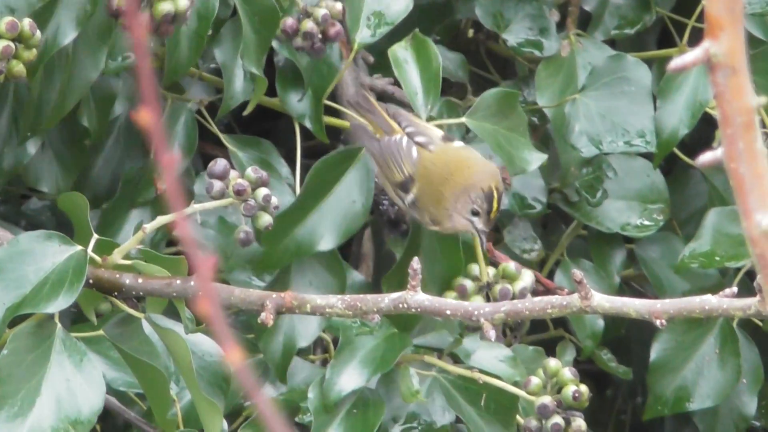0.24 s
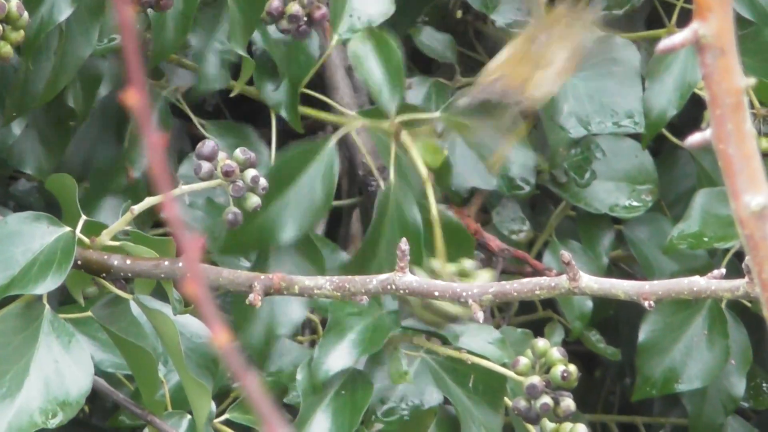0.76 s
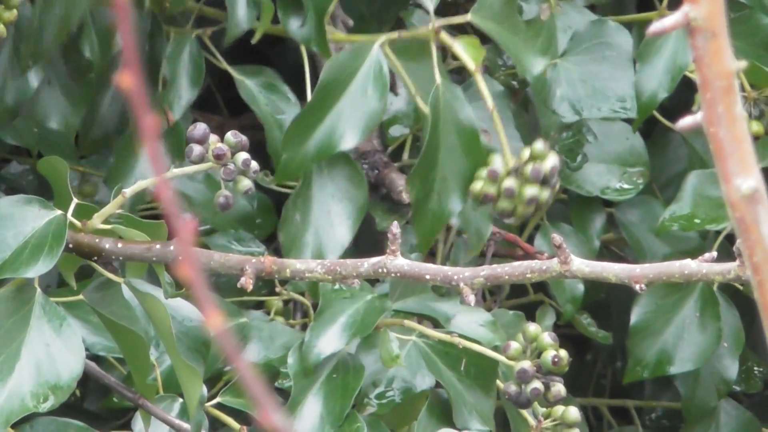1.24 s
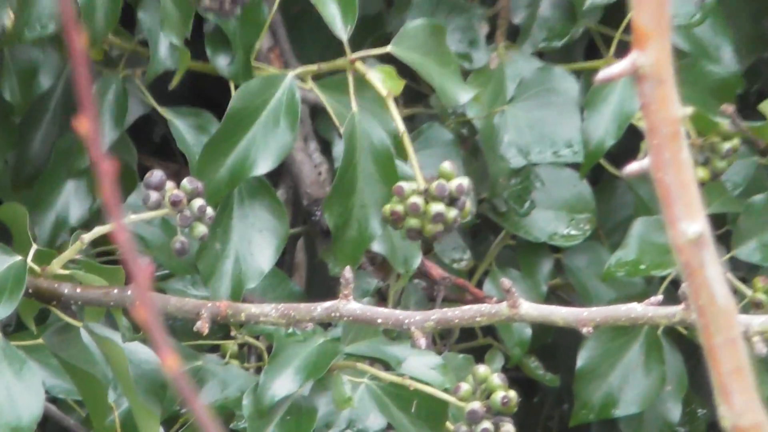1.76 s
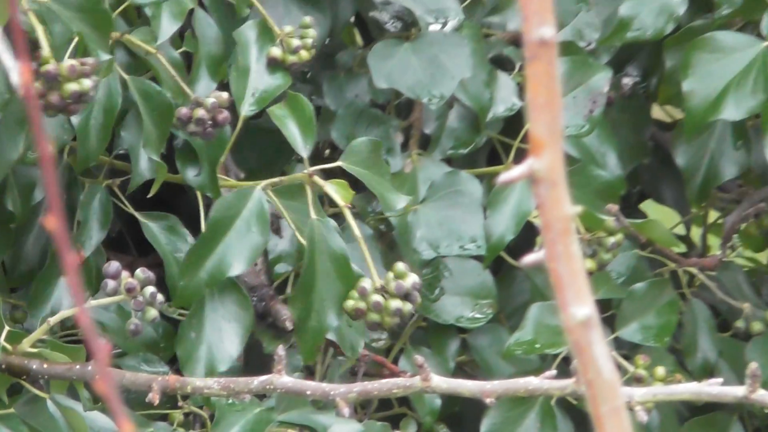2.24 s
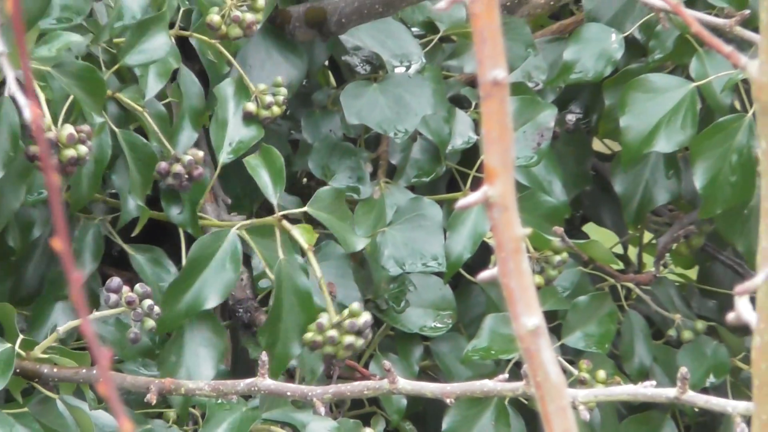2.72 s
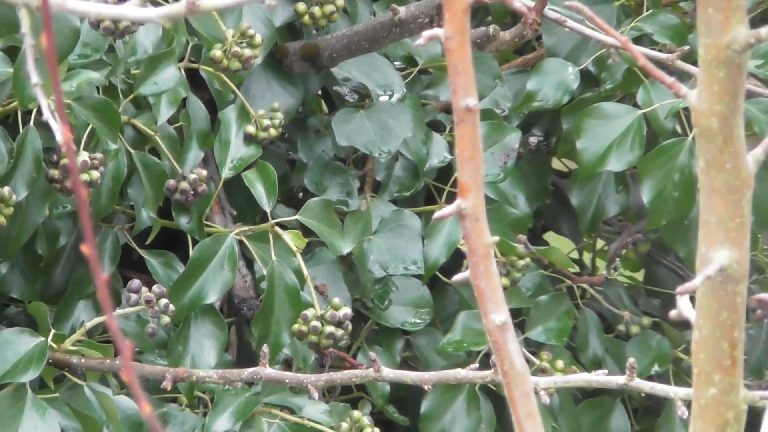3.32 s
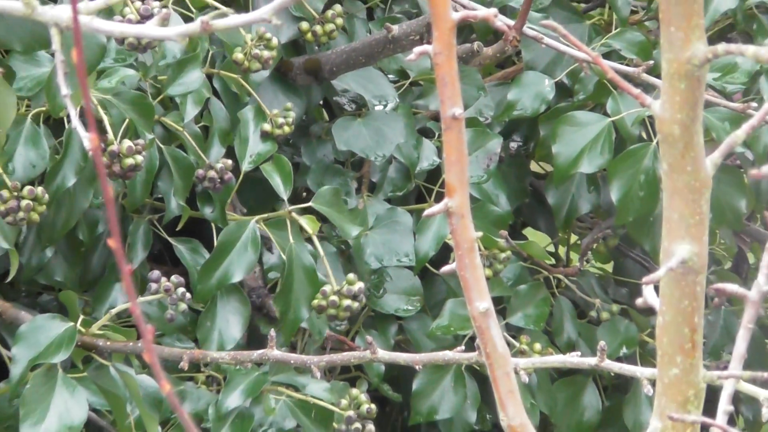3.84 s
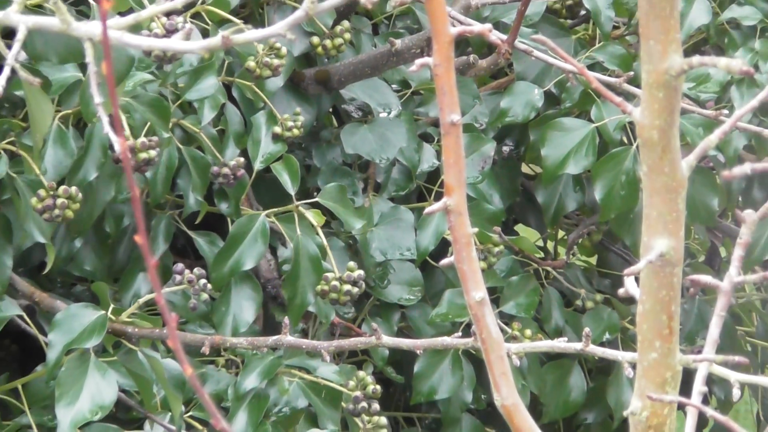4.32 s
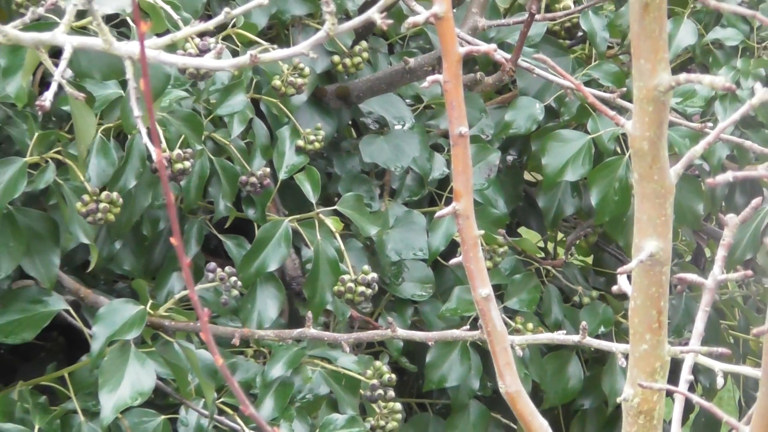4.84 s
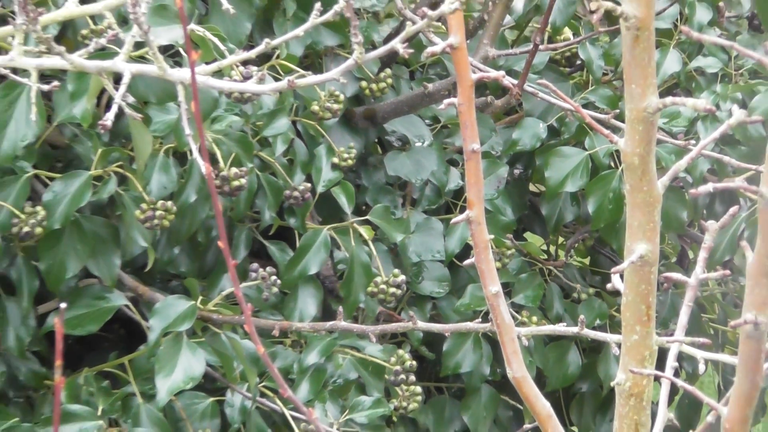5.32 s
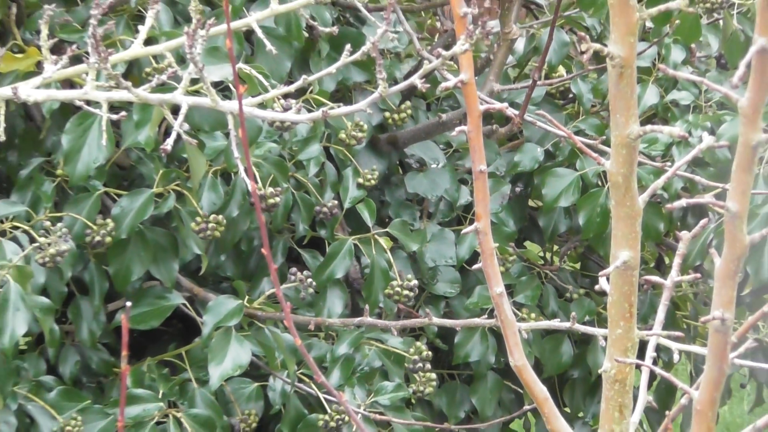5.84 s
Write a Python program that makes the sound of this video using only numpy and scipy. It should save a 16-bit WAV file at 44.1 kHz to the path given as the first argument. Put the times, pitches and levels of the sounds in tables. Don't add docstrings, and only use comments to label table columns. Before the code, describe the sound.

Steady low road rumble with faint hiss; a needle-thin bird whistle, a quick crackle of twigs and wings, then scattered high peeps and buzzy chips.

```python
import sys
import numpy as np
from scipy import signal
from scipy.fft import rfft, irfft, next_fast_len
from scipy.io import wavfile
from scipy.ndimage import uniform_filter1d, map_coordinates

SR = 44100
rng = np.random.default_rng(int(sys.argv[2]) if len(sys.argv) > 2 else 0)


def dump_mix(stems):
    frames = np.atleast_2d(stems).T
    limited = np.clip(frames, -1, 1)
    pcm = np.round(limited * 32767).astype(np.int16)
    wavfile.write(sys.argv[1], SR, pcm)


def gain_from_decibels(decibels):
    exponent = np.asarray(decibels, float) / 20
    return 10 ** exponent


N = 267775

# time in seconds, level in dB.
NEAR_BREATH = [(.575, -64), (.582, -64.5), (.626, -57), (.636, -49.5), (.66, -44), (.746, -42.5),
               (.812, -46.5), (.836, -54), (.848, -65)]
# time in seconds, pitch in Hz, level in dB.
SHORT_WHISTLE = [(3.852, 8130, -66), (3.865, 8050, -60), (3.89, 8070, -54), (3.912, 7940, -48.5),
                 (3.925, 8000, -60), (3.945, 7800, -59), (3.958, 7760, -58), (3.973, 7300, -81)]
# start in seconds, length in seconds, resting pitch in Hz, level in dB, swell in dB.
FAR_WHISTLES = [
    (3.362, 0.21, 8020, -65, 2),
    (5.826, 0.21, 8320, -68, 8),
]
# time in seconds, half length in seconds, depth in dB.
VOICE_BREAKS = [
    (.5915, 0.0018, 29),
    (0.625, .001, 10),
    (5.96, 0.021, 13),
]
# start in seconds, length in seconds, rise in seconds, top pitch in Hz,
# level in dB over CHIP_DB.
CHIP_CALLS = [
    (4.488, .054, 0.0122, 7765, 1.5),
    (5.817, 0.045, 0.008, 7820, -2),
]
# delay in seconds, level in dB.
WALL_ECHOES = [(.007, -11), (.04, -16), (.046, -17), (.078, -19)]
# start in seconds, length in seconds, pitch in Hz, level in dB.
LEVEL_NOTES = [
    (3.403, 0.08, 6670, -69),
    (5.346, .086, 6610, -71.5),
]
# start in seconds, length in seconds, start pitch in Hz, end pitch in Hz, level in dB.
FAINT_NOTES = [(1.35, 0.11, 8850, 8300, -79), (1.527, .07, 8400, 8150, -77), (1.55, .05, 7500, 7100, -78),
               (1.605, .022, 6800, 7500, -73), (1.651, .016, 7900, 7000, -73),
               (3.103, 0.015, 6500, 7330, -70), (3.661, .015, 7600, 7600, -72),
               (3.672, 0.028, 6500, 7100, -73), (3.758, .022, 6200, 7700, -69.5),
               (3.855, .015, 6150, 7000, -73), (5.572, .1, 8150, 8050, -76),
               (3.96, 0.097, 2780, 2780, -82.5), (4.08, .07, 2870, 2800, -86)]
# time in seconds, peak in dB, knock in dB, twig ring in dB (both over peak).
SNAPS = [(.7158, -43.5, -4, -12), (.718, -40.5, -6.5, -3), (0.727, -55, -19, -12),
         (0.7315, -44, -2.5, -7.5), (0.737, -55, -18, -20), (0.84, -51.5, -8, -7), (0.852, -58, -4, -14),
         (0.869, -51, -9, -16), (0.883, -54, -18, -12), (.896, -60, -14, -14), (1.658, -63, -15, -3),
         (1.8462, -60, -11, -12), (4.422, -62, -12, -11), (4.84, -62, -12, -2), (5.1712, -59, -17, -7)]
# centre in Hz, width in Hz, level in dB.
SNAP_LEAVES = [(5860, 1060, 0), (7700, 770, 3.5), (9370, 930, 3.5), (11700, 3900, -12)]
# centre in Hz, width in Hz, level in dB.
TWIG_MODES = [(3360, 200, -3), (4120, 200, 1.5)]
# pitch in Hz, level in dB, 60 dB decay in seconds.
BRANCH_MODES = [(640, 1, 0.038), (1195, -14, 0.045)]
# peak in seconds, rise in seconds, level in dB, broad leaves in dB over it.
WING_BRUSHES = [
    (.716, .001, -53, -8),
    (.88, 0.047, -63, 0),
    (.965, .03, -72, -6),
]
# on in seconds, off in seconds, level in dB.
MOTOR_RUNS = [(.43, 0.61, -69.5), (1.886, 2.177, -71), (2.21, 2.32, -83), (3.303, 3.4, -71),
              (5.56, 5.68, -72)]
# time in seconds, peak in dB.
LENS_TICKS = [(.0273, -66), (.1875, -73), (.2468, -71), (1.127, -74), (1.6563, -70), (1.9068, -72),
              (1.9866, -71), (2.0539, -70), (2.1472, -69), (2.4266, -76), (3.3864, -70), (3.587, -73),
              (3.6269, -71), (3.7471, -70), (4.0185, -70), (4.0664, -71), (5.4866, -72)]
# centre in Hz, width in Hz, level in dB.
BARREL_MODES = [(6500, 120, -4), (6860, 120, -5), (7340, 170, -1.5), (7920, 170, -2.5), (8320, 260, -2),
                (9530, 480, -2.5)]
# time in seconds, level in dB.
TRAFFIC_FLOW = [(0, 2), (.5, -1.5), (1.37, 1.5), (1.66, -2), (2.0, 0.5), (2.74, -2), (3.11, 2), (4.0, .5),
                (4.63, -2), (5.11, -1), (5.5, -5), (6.07, -4.5)]
# frequency in Hz, density in dB per Hz.
RUMBLE_SPECTRUM = [(12, -45), (25, -10), (49, -3.5), (100, 0), (155, 1), (290, 1), (345, -3), (375, -13),
                   (420, -14), (550, -20), (920, -120)]
TYRE_SPECTRUM = [(220, -24.5), (380, -1), (549, -1), (950, -5), (1200, -15), (1300, -22.5), (1410, -38),
                 (1830, -64), (3100, -120)]
AIR_SPECTRUM = [(830, -37), (1410, -10), (1500, 2.5), (1570, 0), (1820, -1.5), (2500, -19), (3250, -40),
                (5500, -120)]
# centre in Hz, width in Hz, level in dB.
FAR_ENGINE = (324, 8.6, -59)
# time in seconds, level in dB.
BREEZE_LEVEL = [(0.0, -74.5), (0.56, -78), (0.79, -77), (1.15, -76.5), (2.45, -80.5), (3.84, -76),
                (3.99, -72.5), (4.6, -83.5), (6.07, -80)]
# frequency in Hz, density in dB per Hz.
LEAF_SPECTRUM = [(1400, -46), (2500, -15), (3000, -3.5), (4200, -3), (5100, -10), (6200, 0), (8000, 4),
                 (11000, -41)]
HISS_SPECTRUM = [(1410, -26), (2400, -32), (2580, -12), (2950, -7), (3400, -8.5), (4170, -10), (4800, -8.5),
                 (5130, -9), (5500, -6), (6400, -5.5), (7300, -0.5), (8410, 1.5), (10100, 1), (15800, 0)]
# frequency in Hz, correlation.
LIKENESS = [(30, -.3), (42, .3), (58, .8), (80, .93), (110, .95), (200, .96), (380, .93), (700, .95),
            (1290, .98), (2200, .76), (3000, .97), (6800, .97), (7800, .7), (9500, .45), (12000, .33),
            (15000, .3)]
# frequency in Hz, left minus right in dB.
BALANCE = [(30, -4.5), (60, -.7), (110, 0), (200, -0.5), (380, 3), (700, 2), (1290, -1.5), (15000, 0)]
# centre in Hz, width in Hz, depth from 0 to 1.
HOUSING_NOTCHES = [(1440, 85, 0.9), (5120, 650, 0.51)]

SAG_HZ_PER_S, SETTLE_HZ = 6550, 150
NEAR_TOP_HZ, NEAR_REST_HZ = 8775, 7385
FAR_TOP_HZ, SWELL_S, RELEASE_S, RELEASE_DB = 8860, 0.09, 0.03, 10
CHIP_DB, CHIP_RISE_HZ_PER_S, CHIP_SAG_HZ_PER_S = -50.5, 31000, 10000
CHIP_BREAK_S, CHIP_BEAT_S, CHIP_GAP_S, CHIP_GAP_DB = 0.005, 0.0245, 0.0025, 18
EDGE_S, EDGE_CURL_HZ, EDGE_DB = 0.012, 90, 6
FAINT_BEND, FAINT_WAVER = 0.64, 0.007
SPLINTER_S, FLUTTER_T60_S = 0.003, 0.22
STEP_S, STEP_PHASE_S, STEP_SHARE, STEP_DB = 0.02, 0.0068, 0.11, -76
RUMBLE_DB, TYRES_DB, AIR_DB, HISS_DB = -46, -52.5, -79.5, -67.5
RUMBLE_GROWS, TYRES_GROWS = 0.41, 0.17
TOP_HZ = 15740


def near_bird():
    track = np.zeros(N)
    s, db = np.transpose(NEAR_BREATH)
    t = times(s[0], s[-1] - s[0])
    level = np.interp(t, s, db) - breaks(t, VOICE_BREAKS)
    rows = np.c_[t, fall(t, NEAR_TOP_HZ, NEAR_REST_HZ), level]
    add(track, s[0], whistle(rows, waver_hz=12, flicker_db=1.5, rate=270, edge=0.0012))
    return ports(garden(track, t60=0.28, wet_db=-11), pan_db=-5, lead=0.2)


def short_whistle():
    track = np.zeros(N)
    add(track, SHORT_WHISTLE[0][0], whistle(SHORT_WHISTLE, waver_hz=18, flicker_db=0.5, rate=180))
    return ports(garden(track, t60=0.32, wet_db=-9), pan_db=-6, lead=0.25)


def far_bird():
    track = np.zeros(N)
    for s, length, rest_hz, db, swell_db in FAR_WHISTLES:
        t = times(s, length)
        knots = [0, SWELL_S, length - RELEASE_S, length]
        level = np.interp(t - s, knots, [db - swell_db, db, db, db - RELEASE_DB])
        rows = np.c_[t, fall(t, FAR_TOP_HZ, rest_hz), level - breaks(t, VOICE_BREAKS)]
        add(track, s, whistle(rows, waver_hz=18, flicker_db=2.5, rate=170))
    return ports(garden(track, t60=0.3, wet_db=-3), pan_db=2.5, lead=1)


def chips():
    track = np.zeros(N)
    for s, length, rise, top_hz, db in CHIP_CALLS:
        t, top = times(s, length), s + rise
        pitch = top_hz - np.maximum(CHIP_RISE_HZ_PER_S * (top - t), CHIP_SAG_HZ_PER_S * (t - top))
        gaps = [(top + CHIP_BREAK_S + k * CHIP_BEAT_S, CHIP_GAP_S, CHIP_GAP_DB / (2 * k + 1))
                for k in range(2)]
        rows = np.c_[t, pitch, db - breaks(t, gaps)]
        chip = whistle(rows, waver_hz=35, flicker_db=2.2, rate=300, edge=0.0016)
        for delay, wall_db in [(0.00078, 0)] + WALL_ECHOES:
            add(track, s + delay, gain_from_decibels(CHIP_DB + wall_db) * chip)
    return ports(garden(track, t60=0.19, wet_db=-14), pan_db=-1, lead=-0.81)


def other_birds():
    track = np.zeros(N)
    ends = np.array([1, 0, 0, 1])
    for s, length, hz, db in LEVEL_NOTES:
        knots = s + np.array([0, EDGE_S, length - EDGE_S, length])
        call = np.c_[knots, hz + EDGE_CURL_HZ * ends, db - EDGE_DB * ends]
        add(track, s, whistle(call, waver_hz=25, flicker_db=1.8, rate=143))
        fifth = whistle(call, waver_hz=40, flicker_db=2.5, rate=150, ratio=3 / 2)
        add(track, s, gain_from_decibels(-12.5) * fifth)
    for s, length, start_hz, end_hz, db in FAINT_NOTES:
        middle_hz = start_hz + FAINT_BEND * (end_hz - start_hz)
        rows = [(s, start_hz, db), (s + length / 2, middle_hz, db), (s + length, end_hz, db)]
        add(track, s, whistle(rows, waver_hz=FAINT_WAVER * start_hz, flicker_db=2.5, rate=190, edge=0.0032))
    return ports(garden(track, t60=0.23, wet_db=-9), pan_db=-4, lead=0.6)


def snaps():
    cracks, rings, knocks = np.zeros((3, N))
    t = np.arange(SR // 20) / SR
    knock = sum(gain_from_decibels(db - 60 * t / t60) * np.sin(2 * np.pi * hz * t) for hz, db, t60 in BRANCH_MODES)
    knock = knock * (1 - np.exp(-t / 0.0019))
    for s, db, knock_db, ring_db in SNAPS:
        splinters = rng.standard_normal(len(t)) + 3.1 * (t == 0)
        add(cracks, s, gain_from_decibels(db + 8 - 26 * t / SPLINTER_S) * splinters)
        rings[round(s * SR)] = gain_from_decibels(db + ring_db + 30.5)
        add(knocks, s, gain_from_decibels(db + knock_db + 15) * knock)
    twig = filtered(rings, lambda hz: resonances(TWIG_MODES)(hz) * resonances([(4000, 3000, 0)])(hz))
    return filtered(cracks, resonances(SNAP_LEAVES)) + twig, knocks


def wings():
    now = np.arange(N) / SR
    beats = 0
    for s, rise, db, broad_db in WING_BRUSHES:
        loss_db = np.maximum(12 * (s - now) / rise, 60 * (now - s) / FLUTTER_T60_S)
        beats = beats + gain_from_decibels([[db], [db + broad_db]] - loss_db)
    rustle = beats * gain_from_decibels(3 + 2.5 * wobble(250)) * rng.standard_normal(N)
    small_and_broad = [(7800, 4700, 3), (2270, 1100, 0.5)]  # (Hz, width Hz, dB)
    leaves = lambda hz: np.array([resonances([mode])(hz) ** 2 for mode in small_and_broad])
    return filtered(rustle, leaves).sum(axis=0)


def takeoff():
    cracks, knocks = snaps()
    hedge = garden(cracks + wings(), t60=0.043, wet_db=-9.5)
    return ports(hedge, pan_db=2, lead=0.95) + knocks * gain_from_decibels([[1.9], [-1.9]])


def lens():
    t, gate, steps = np.arange(N) / SR, np.zeros(N), np.zeros(N)
    for on, off, db in MOTOR_RUNS:
        gate += gain_from_decibels(db) * np.clip(np.minimum(t - on, off - t) / 0.0058, 0, 1)
    turns = np.arange(STEP_PHASE_S, N / SR, STEP_S)
    luck = rng.random((len(turns), 2))
    small = [(s, STEP_DB + 3 * size) for s, (chance, size) in zip(turns, luck) if chance < STEP_SHARE]
    for s, db in small + LENS_TICKS:
        steps[round(s * SR)] = gain_from_decibels(db + 23)
    motor = filtered(rng.standard_normal(N), lambda hz: resonances(BARREL_MODES)(hz) ** 2)
    ticks = filtered(steps, resonances([(4300, 600, 9.5), (3200, 310, -8), (7500, 2500, -11)]))
    return ports(gate * unit(motor) + ticks, pan_db=-3, lead=-0.89)


def road():
    s, db = np.transpose(TRAFFIC_FLOW)
    flow_db = np.interp(np.arange(N) / SR, s, db)
    swell_db = 0.16 * wobble(3.245)
    hz, width, drone_db = FAR_ENGINE
    engine = unit(filtered(rng.standard_normal(N), resonances([(hz, width, 0)])))
    drone = gain_from_decibels(drone_db + 1.5 * wobble(1.2)) * engine
    rumble = gain_from_decibels(RUMBLE_DB + RUMBLE_GROWS * flow_db + swell_db) * rush(RUMBLE_SPECTRUM, patchy_db=-0.36)
    tyres = gain_from_decibels(TYRES_DB + TYRES_GROWS * flow_db + swell_db) * rush(TYRE_SPECTRUM, patchy_db=0.45)
    air = gain_from_decibels(AIR_DB + flow_db) * rush(AIR_SPECTRUM, patchy_db=0.8)
    return drone + rumble + tyres + air


def breeze():
    s, db = np.transpose(BREEZE_LEVEL)
    level_db = np.interp(np.arange(N) / SR, s, db) - 1.5 + 1.2 * wobble(14)
    return gain_from_decibels(level_db) * rush(LEAF_SPECTRUM, patchy_db=1.2)


def hiss():
    return gain_from_decibels(HISS_DB) * rush(HISS_SPECTRUM, patchy_db=1)


def whistle(rows, waver_hz, flicker_db, rate, edge=0.0027, ratio=1):
    s, hz, db = np.transpose(rows)
    t = np.arange(s[0], s[-1], 1 / SR)
    pitch = ratio * (np.interp(t, s, hz) + waver_hz * wobble(rate, size=len(t)))
    fade = np.clip(np.minimum(t - s[0], s[-1] - t) / edge, 0, 1)
    level = gain_from_decibels(np.interp(t, s, db) + flicker_db * wobble(rate, size=len(t)))
    return np.sqrt(2) * fade * level * np.sin(2 * np.pi * np.cumsum(pitch) / SR)


def fall(s, top_hz, rest_hz):
    above_hz = top_hz - rest_hz - SAG_HZ_PER_S * (s - s[0])
    return rest_hz + SETTLE_HZ * np.logaddexp(0, above_hz / SETTLE_HZ)


def breaks(t, catches):
    return sum(depth_db * np.clip(1.5 - abs(t - s) / half, 0, 1) for s, half, depth_db in catches)


def times(s, length):
    return s + np.arange(0, length, 1 / 2000)


def garden(x, t60, wet_db):
    t = np.arange(SR // 2) / SR
    common, apart = rng.standard_normal(len(t)), rng.standard_normal((2, len(t)))
    tail = (common + 0.7 * apart) * gain_from_decibels(-60 * t / t60) * (1 - np.exp(-t / 0.0015))
    tail = tail / np.linalg.norm(tail[0])
    return x + gain_from_decibels(wet_db) * signal.fftconvolve(x[None], tail, axes=1)[:, :N]


def ports(x, pan_db, lead):
    apart = lambda hz: np.outer([0.5, -0.5], np.clip((hz - 7100) / 1100, 0, 1.6))
    return filtered(x, lambda hz: gain_from_decibels(pan_db * apart(hz)) * np.exp(1j * lead * apart(hz)))


def rush(spectrum, patchy_db):
    z = signal.stft(rng.standard_normal((2, N + 512)), nperseg=512)[2]
    field = uniform_filter1d(rng.standard_normal(z.shape[1:]), size=6, axis=0)
    field = uniform_filter1d(field, size=14, axis=1)
    pair = signal.istft(z * gain_from_decibels(patchy_db * unit(field)), nperseg=512)[1][:, :N]
    turn = lambda hz: np.arccos(np.clip(along(LIKENESS, hz), -1, 1)) / 2
    mid, side = filtered(pair, lambda hz: gain_from_decibels(along(spectrum, hz)) * [np.cos(turn(hz)), np.sin(turn(hz))])
    sides = np.array([mid + side, mid - side]) / np.std(mid)
    return filtered(sides, lambda hz: gain_from_decibels(np.outer([0.5, -0.5], along(BALANCE, hz))))


def resonances(modes):
    def response(f):
        return sum((-1) ** k * gain_from_decibels(db) * 1j * f * w / (c * c - f * f + 1j * f * w)
                   for k, (c, w, db) in enumerate(modes))
    return response


def filtered(x, response):
    m = next_fast_len(N + SR // 2)
    return irfft(rfft(x, m) * response(np.fft.rfftfreq(m, 1 / SR)), m)[..., :N]


def along(points, hz):
    f, v = np.transpose(points)
    return np.interp(np.log(hz + 1), np.log(f + 1), v)


def wobble(rate, size=N):
    knots = rng.standard_normal(size // 8 + 4)
    return map_coordinates(knots, [np.arange(size) * min(rate / SR, 1 / 8)])


def unit(x):
    return x / np.sqrt(np.mean(x ** 2) + 1e-20)


def add(track, s, sound):
    part = track[round(s * SR):][:len(sound)]
    part += sound[:len(part)]


def scene():
    birds = near_bird() + short_whistle() + far_bird() + chips() + other_birds()
    return birds + takeoff() + lens() + road() + breeze() + hiss()


def band_limit(x):
    return signal.sosfilt(signal.butter(12, 16820, fs=SR, output="sos"), x)


def record(dry):
    def housing(hz):
        dips = [1 - depth * resonances([(c, w, 0)])(hz) for c, w, depth in HOUSING_NOTCHES]
        return np.prod(dips, axis=0) * (hz < TOP_HZ)
    return band_limit(filtered(dry, housing))


dry = scene()
out = record(dry)
dump_mix(out)
```